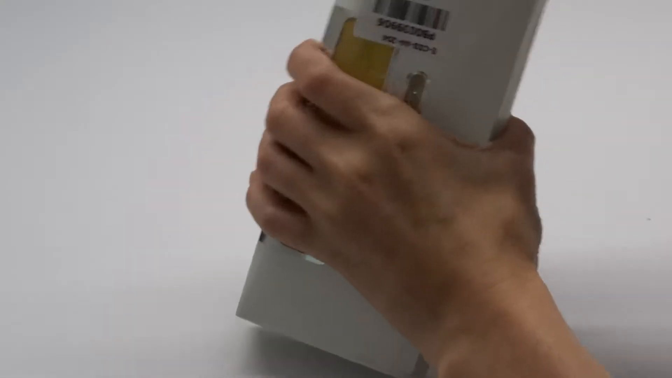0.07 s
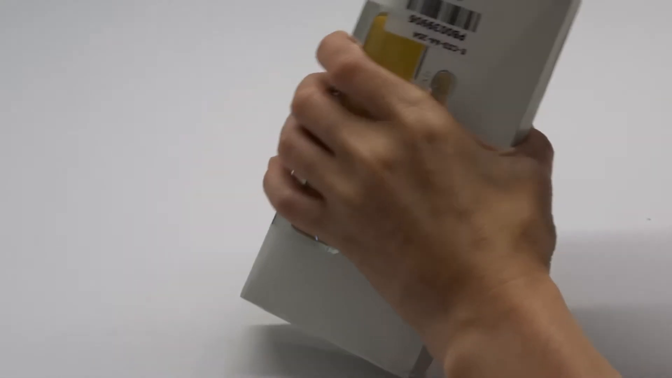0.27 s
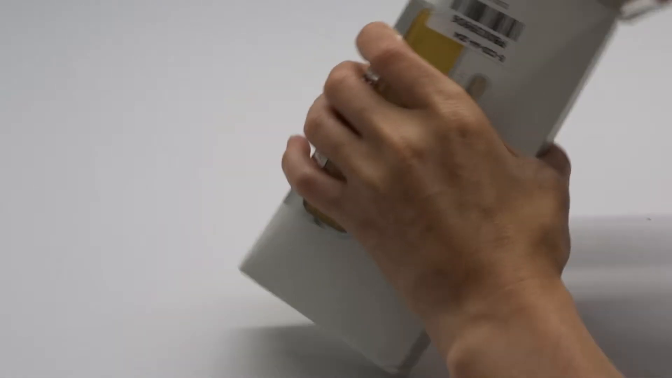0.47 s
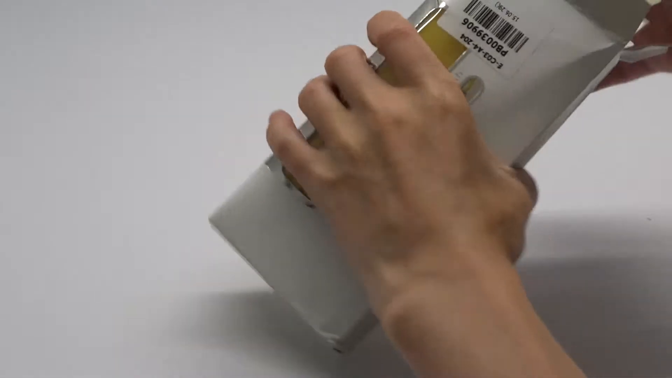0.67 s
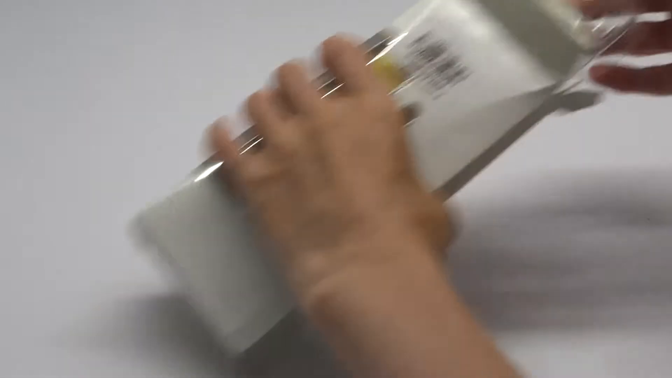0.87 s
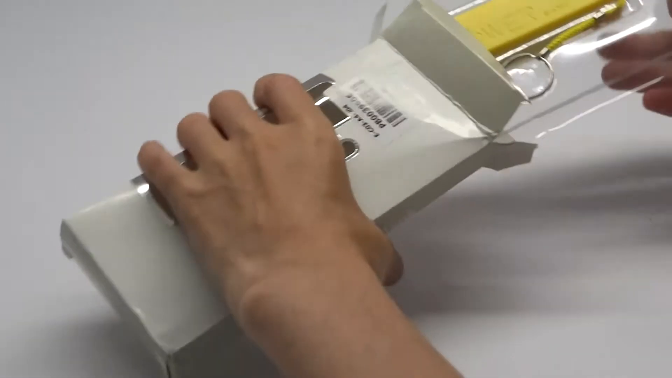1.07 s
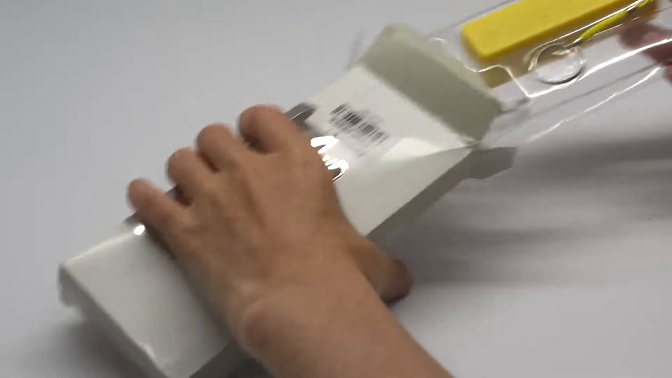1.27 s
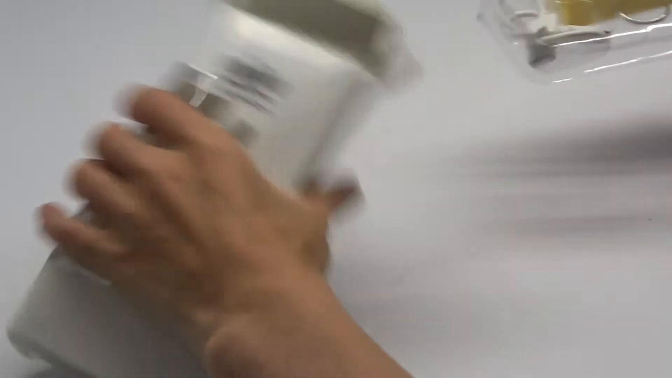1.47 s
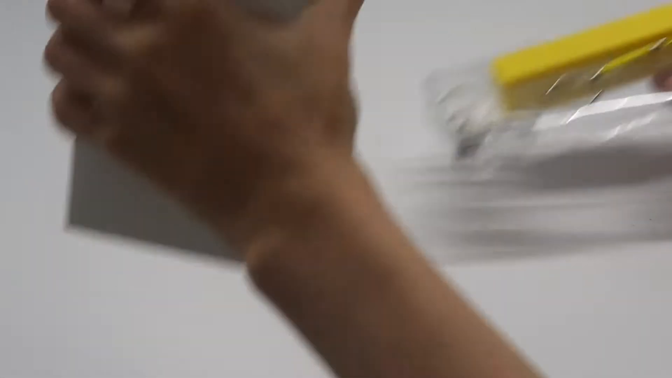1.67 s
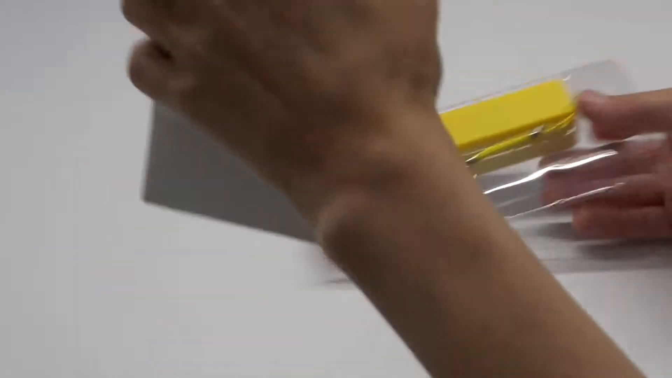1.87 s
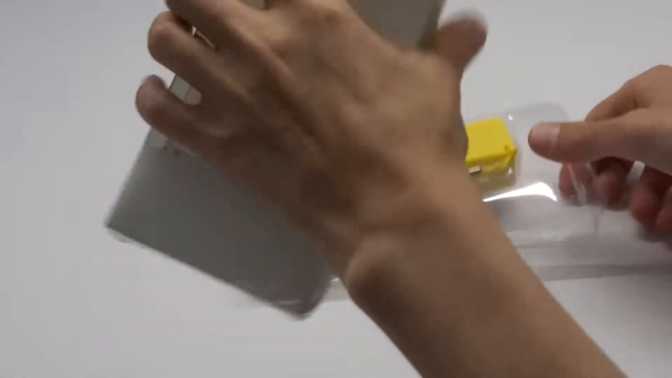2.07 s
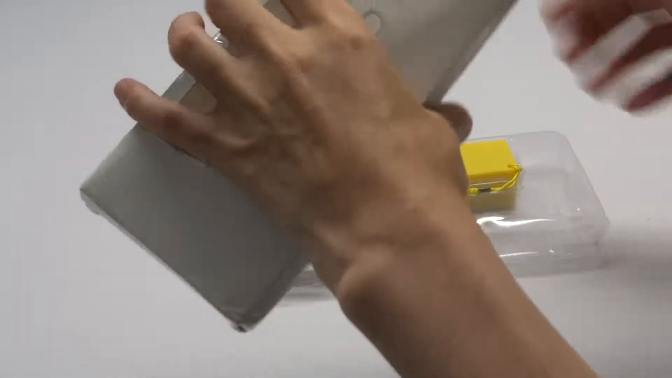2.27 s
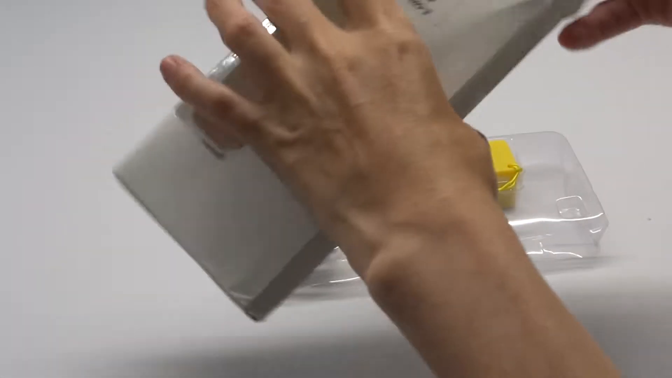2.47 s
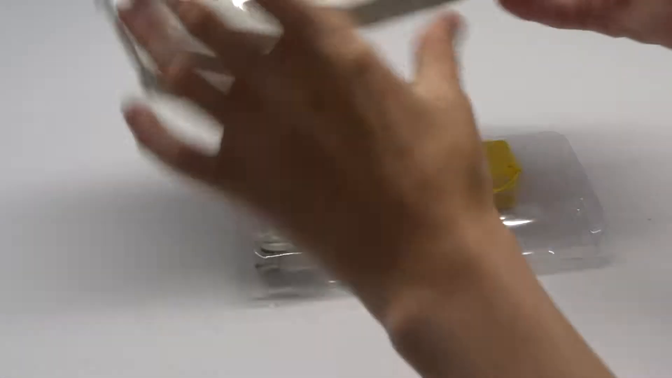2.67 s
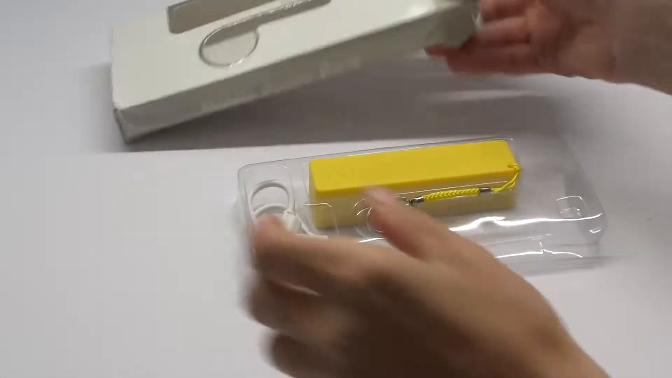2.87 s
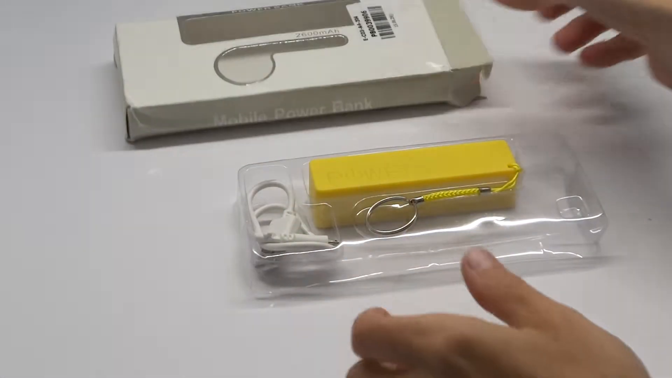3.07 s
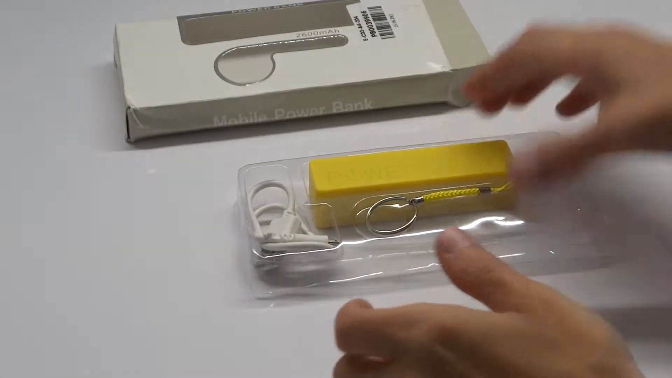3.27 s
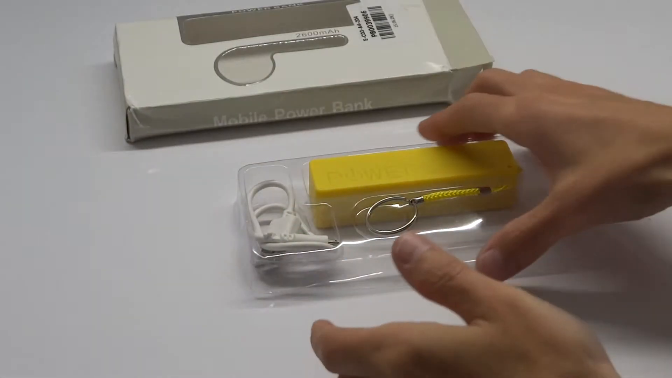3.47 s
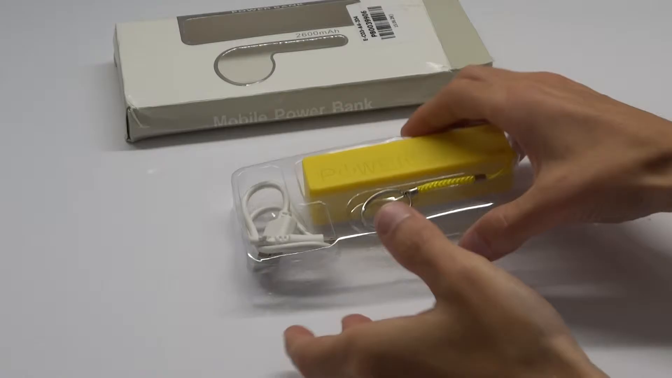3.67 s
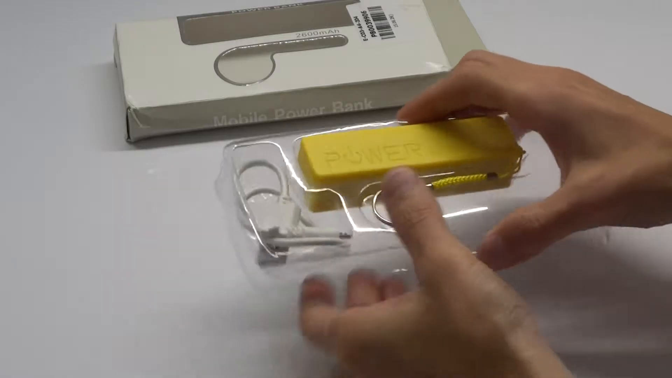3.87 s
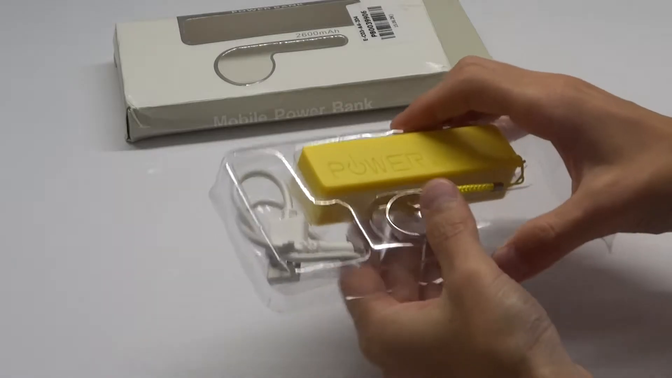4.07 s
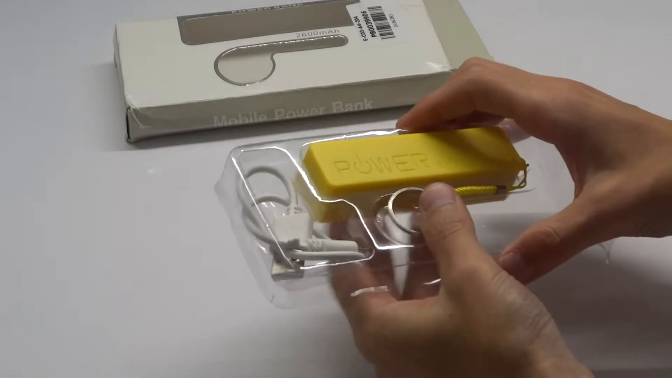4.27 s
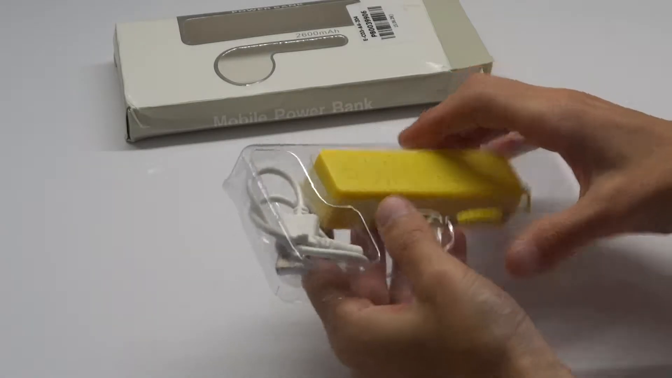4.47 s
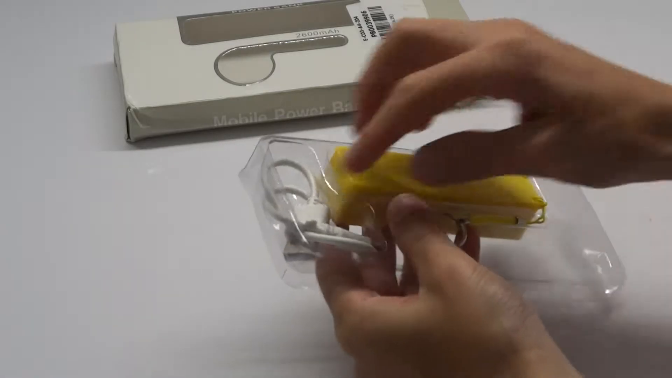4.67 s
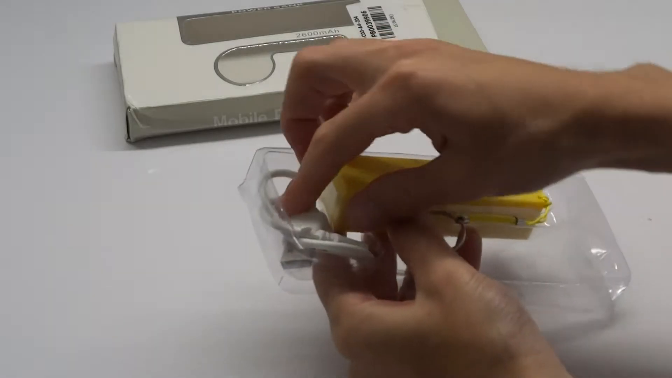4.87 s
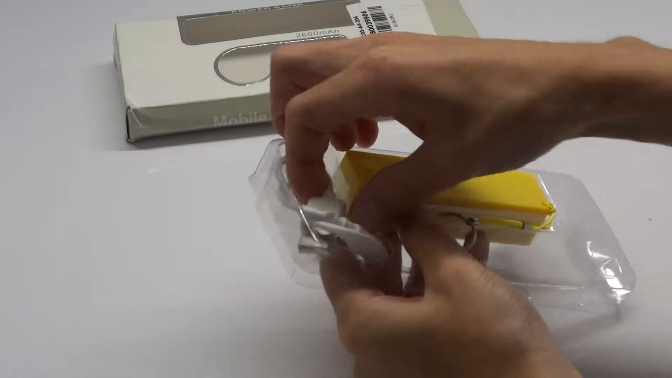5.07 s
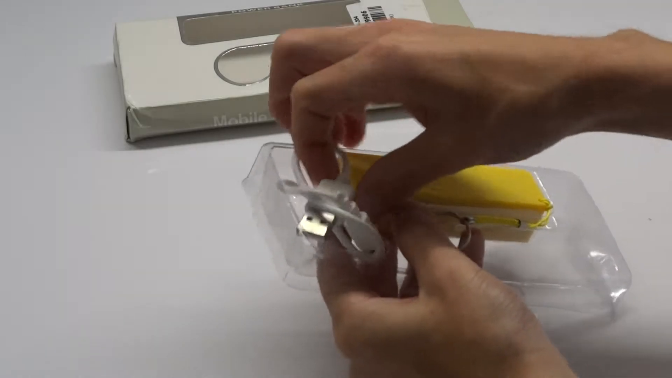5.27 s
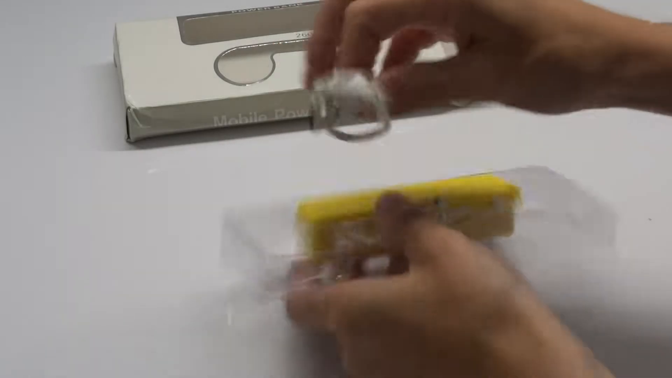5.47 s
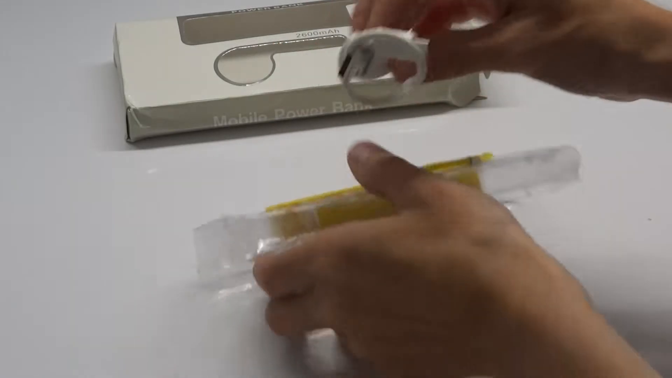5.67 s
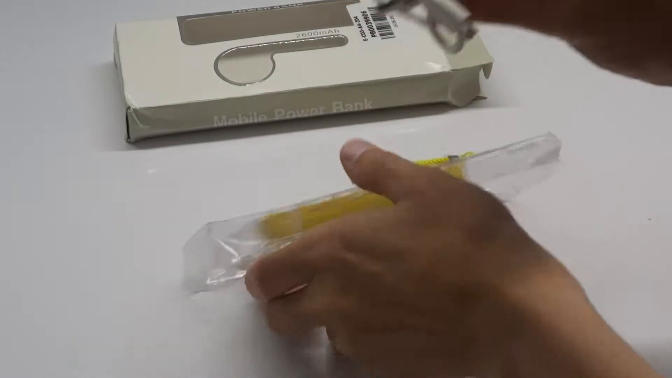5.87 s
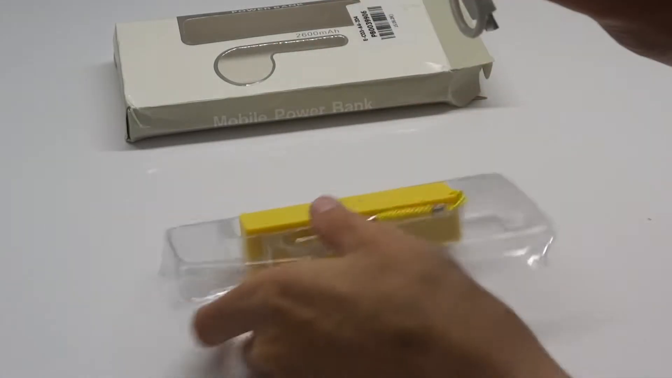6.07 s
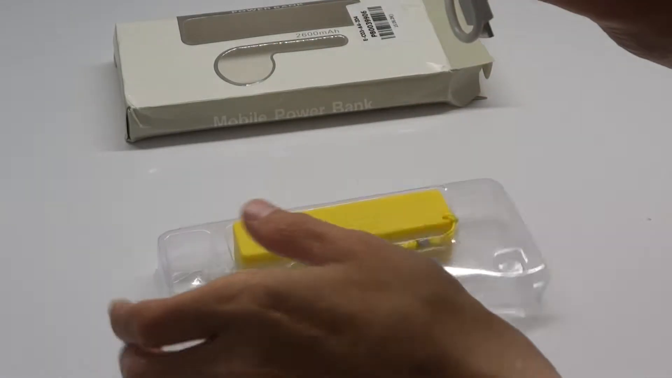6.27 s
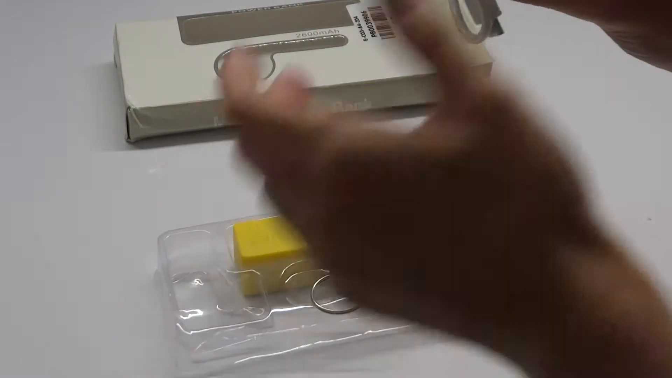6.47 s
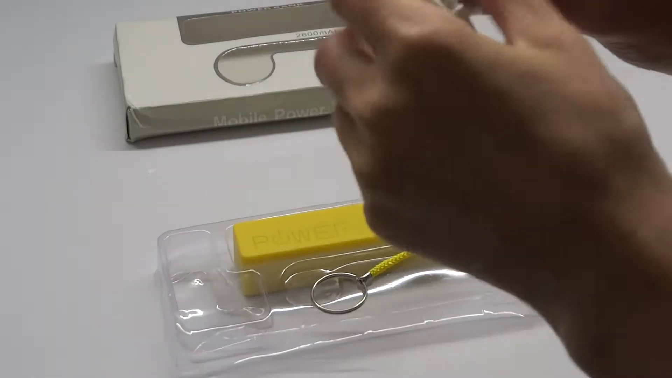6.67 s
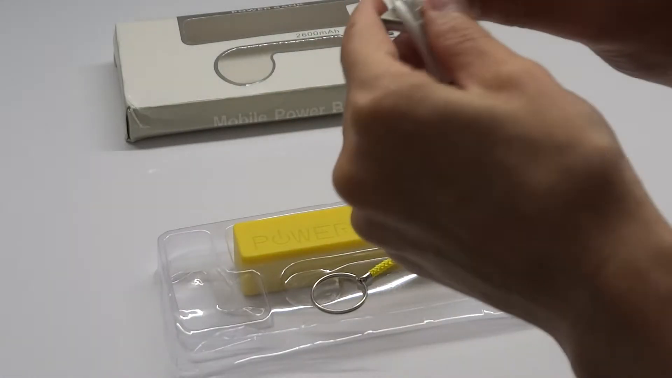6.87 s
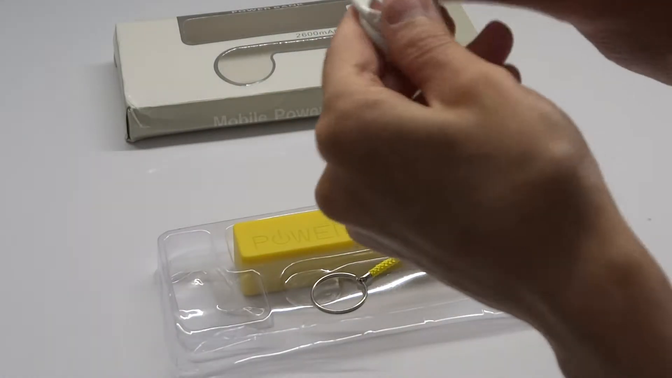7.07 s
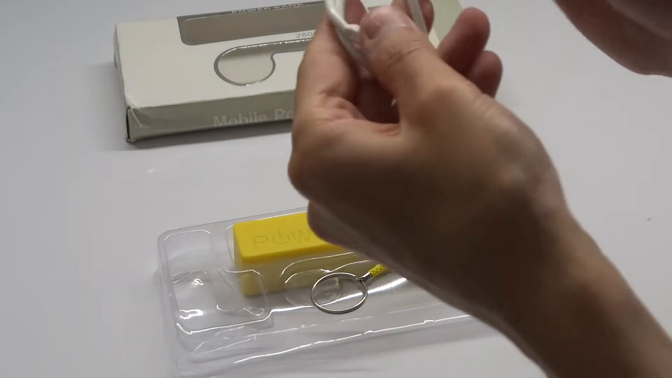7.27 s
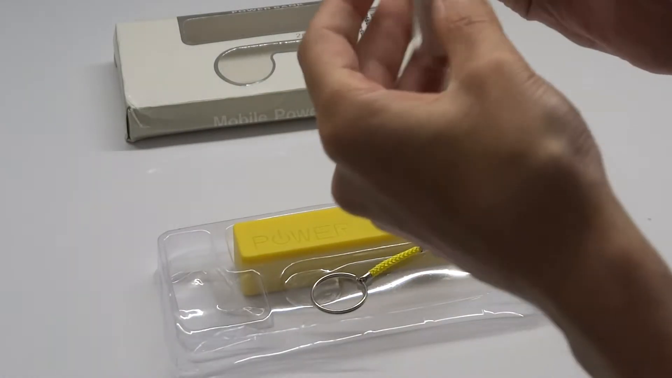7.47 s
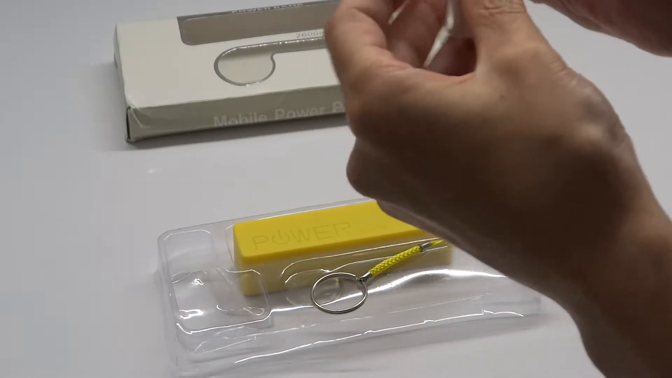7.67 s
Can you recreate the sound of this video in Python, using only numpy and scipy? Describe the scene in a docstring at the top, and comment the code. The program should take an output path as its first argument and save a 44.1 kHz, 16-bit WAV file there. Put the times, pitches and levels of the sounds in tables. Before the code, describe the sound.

Close handling of card and clear plastic packaging: sharp crinkly pops, brief rubbing, light box thuds and a chattering drag, over faint hiss.

```python
"""Hands pull a thin plastic tray out of a card box, lay both on a table and flex the tray, close by.
A faint hiss with thin tones runs throughout. From the start, surfaces rub in tiny slips, a small hard
room answers, and buckling film and card snap and knock: short noise bursts ring panel, hollow and edges.
Just before one second come the first of four thuds of the box on the table; around two seconds the tray
is dragged in four jerks that make its rim chatter. Rubbing and snaps go on, thinning out at the end."""
import sys
import numpy as np
from scipy import signal
from scipy.fft import rfft, irfft, next_fast_len
from scipy.io import wavfile
from scipy.ndimage import map_coordinates

SR = 44100
rng = np.random.default_rng(int(sys.argv[2]) if len(sys.argv) > 2 else 0)


def unload_audio(sound):
    """Save the sound as a 16-bit wav file, at the path given as the first command line argument."""
    columns = np.transpose(np.atleast_2d(sound))
    # keep every value between -1 and 1, then stretch to whole-number steps
    steps = np.round(np.clip(columns, -1, 1) * 32767)
    wavfile.write(sys.argv[1], SR, steps.astype(np.int16))


N = 340872  # length in samples

# Steady hiss: (frequency [Hz], relative level [dB per Hz])
HISS_COLOUR = [(15, -54), (25, -16), (140, -24), (189, -16.5), (324, -5.5), (361, -12.5), (472, -7),
               (670, -6.5), (901, -5.5), (1210, -6.5), (5200, -18.5), (7790, -18), (15700, -22.5)]
# How alike the hiss is on the left and right: (frequency [Hz], likeness [0 to 1])
HISS_LIKENESS = [(60, 0.53), (180, 0.23), (550, 0.24), (1650, 0.14), (4970, 0.66), (15000, 1)]
# Faint wavering tones: (frequency [Hz], middle level [dB rms])
FAINT_TONES = [(7850, -87), (12958, -87), (14002, -88)]
# Sliding strokes: (start [s], swell [s], hold [s], scrape [dB], hollow against scrape [dB],
# fizz against scrape [dB])
STROKES = [(-0.01, 0.0091, 0.0067, -36, -8.5, -2.5), (0.25, 0.087, 0.27, -52.5, 1.5, -2),
           (0.62, .12, .08, -56, 8, -0.5), (0.803, 0.069, 0.16, -30.5, -8.5, -3),
           (0.985, 0.042, 0.025, -50.5, -9, -7.5), (1.12, 0.12, .2, -55, 4, 0.5),
           (1.5, 0.065, 0.16, -62, -8.5, 2), (1.834, .03, 0.081, -41.5, -6.5, -12.5),
           (2.13, 0.021, 0.044, -28, -21.5, -2.5), (2.216, 0.022, 0.16, -44.5, -8.5, -13),
           (2.425, 0.045, 0.15, -59, -1, 0.5), (3.597, .08, 0.091, -56, -11.5, -1.5),
           (4.273, 0.083, .08, -57.5, -6, -6), (4.45, 0.081, 0.026, -43, -7, -6),
           (4.618, 0.047, .06, -70, -4.5, 4), (4.817, 0.075, 0.13, -67, -5.5, -7.5),
           (5.35, 0.17, .06, -53.5, 4.5, 4), (5.523, 0.044, .03, -40.5, -7, -23),
           (5.98, 0.26, .12, -38, -6.5, -2.5), (6.311, 0.023, 0.022, -27, -15, -37)]
# Sound of the flexing sheet: (frequency [Hz], relative level [dB per Hz])
FILM_COLOUR = [(300, -43.5), (700, -20), (1300, -2), (2200, 3), (4000, -0.5), (6500, -6), (11000, -26.5),
               (18000, -72)]
# Table top, air and walls of box and tray: (frequency [Hz], width [Hz], relative level [dB])
HOLLOW_MODES = [(180, 140, -17), (340, 130, -9.5), (673, 197, 5), (816, 503, 0)]
# Fizz from the sharp edges of a break: (frequency [Hz], relative level [dB per Hz])
FIZZ_COLOUR = [(2000, -52), (4500, -4.5), (6500, 2), (9000, 2.5), (12900, -0.5), (14900, -10), (15700, -21),
               (16400, -37.5)]
# How long the room rings: (frequency [Hz], time to fall 60 dB [s])
ROOM_FADE = [(150, 0.14), (600, 0.35), (2000, 0.33), (5000, 0.28), (14000, 0.22)]
# Room sound, side against middle: (frequency [Hz], level [dB])
ROOM_SPREAD = [(60, -16.5), (150, -19), (700, -11.5), (4000, -12), (9000, -13.5), (15000, -27)]
# Snaps and knocks: (time [s], relative level [dB], panel pitch [Hz], relative hollow level [dB],
# relative crack level [dB], time for the driving burst to fall 60 dB [s])
SNAPS = [(0.014, -21.5, 2880, -17, -8.5, .015), (0.0418, -40, 2360, -17, -24, 0.017),
         (0.1114, -16.5, 2790, -32, -11, .044), (0.1245, -22.5, 1690, -11.5, -2.5, .068),
         (0.2638, -31.5, 2550, -11, -17, .024), (0.2828, -26.5, 2520, -36, -19, .026),
         (0.3424, -11.5, 2600, -41, -20.5, .014), (0.503, -17, 2760, -25.5, -13.5, 0.081),
         (0.5147, -17, 2928, -6.5, -7.5, .053), (0.5352, -9.5, 2100, -15.5, -14, .03),
         (0.6589, -31, 2290, -39.5, -10.5, .034), (0.6836, -23, 2164, -20, -28.5, .018),
         (0.7149, -20, 1251, -5.5, -29, .039), (0.7327, -19, 2910, -32, -37.5, .04),
         (0.7761, -22, 2450, 3.5, -20, .013), (0.7939, -2.5, 2440, -43, -12.5, .03),
         (0.8676, -7, 2400, -18, -10, .025), (0.8756, -2, 2200, -10.5, -16.5, .03),
         (0.8964, -9, 1532, -23, -31, .07), (0.9911, -13.5, 3922, -7, -6, .083),
         (1.1074, -25.5, 1560, 0, -20, .027), (1.2395, -21.5, 5030, -27, -14, .036),
         (1.2913, -14, 6110, -16, -11.5, .074), (1.3545, -3, 6280, -22, -6.5, .014),
         (1.3604, -4, 4530, -18.5, -23.5, .03), (1.4074, -21.5, 1710, -8.5, -38, .027),
         (1.5616, -27, 1380, -9.5, -15, .03), (1.6034, -26, 1355, -12, -16, .03),
         (1.8394, -18.5, 3313, -15, -12, .027), (2.151, -7.5, 6830, -19, -5.5, .025),
         (2.2188, -4.5, 3216, -14, -12.5, .038), (2.2538, -6, 2070, -13.5, -9, .077),
         (2.3125, -14.5, 1523, -5, -32.5, .03), (2.3295, -10.5, 2095, -28, -11, .034),
         (2.361, -19, 1785, -36.5, -7, .03), (2.3925, -25, 1800, -10.5, -22.5, .03),
         (2.4851, -33.5, 1513, -9, -20, 0.029), (2.5227, -32, 9680, -17, -15.5, .034),
         (2.5511, -23, 2130, -9, -20.5, .05), (2.578, -17.5, 2170, -11.5, -19, .03),
         (2.9362, -8.5, 1280, -17, -14, .026), (2.9414, -5, 3500, -9.5, -18, .037),
         (3.1133, -16.5, 2240, -3.5, -13, .017), (3.1204, -24, 1360, -14, -36, .018),
         (3.6142, -34.5, 2107, -8.5, -13.5, .03), (3.677, -44, 2810, -5, -19, .03),
         (3.694, -27.5, 1960, -16, -9.5, .052), (3.7295, -10.5, 2986, -52, -51, .012),
         (4.127, -38.5, 1450, -21, -14, .026), (4.147, -36.5, 1520, -18, -16, .054),
         (4.3036, -46.5, 1390, -26, -3, .03), (4.3256, -40, 2000, -28, -0.5, .023),
         (4.3774, -29, 3540, -24, -14.5, .09), (4.4029, -23, 1640, -8.5, -9.5, .026),
         (4.4896, -15.5, 1410, -39, -13, .022), (4.5493, -24.5, 4440, -11, -7, .03),
         (4.578, -15.5, 4040, -26, -15, .01), (4.7366, -34, 1900, -6.5, -37, .03),
         (4.8359, -35.5, 4240, -15, -20, .045), (5.0454, -19, 3210, -19, -17.5, .015),
         (5.0604, -18, 2127, -18, -7.5, .016), (5.0914, -22, 1490, -10.5, -32, .035),
         (5.1967, -6.5, 4050, -40, -17, .03), (5.229, -6.5, 2590, -18.5, -17, .057),
         (5.3787, -23.5, 2570, -13.5, -12, .023), (5.443, -32.5, 2600, -30.5, -2.5, .04),
         (5.4824, -19.5, 2570, -8, -28.5, .018), (5.4891, -2, 3110, -22, -10.5, .048),
         (5.5822, -10.5, 1280, -14, -12.5, .018), (5.6, -11.5, 1876, -38, -6, .026),
         (5.6224, -23, 1850, -27.5, -3, .015), (5.6825, -22, 2122, -5.5, -11.5, .017),
         (5.7217, -9.5, 1860, -11, -18, .036), (5.7975, -29, 2065, -30, -7, .03),
         (5.8135, -12, 4080, -19.5, -9, .038), (5.92, -4.5, 2387, -13.5, -15, .015),
         (6.0023, -16.5, 1840, -15, -23, .037), (6.0709, -3, 1680, -26.5, -18.5, .019),
         (6.1859, -30.5, 1844, -11, -5, .038), (6.2516, -10.5, 2030, -17.5, -32, .03),
         (6.2824, -23, 1360, -13, -5, .03), (6.2964, -23, 2170, -27.5, -15.5, .037),
         (6.3158, -11.5, 9900, -23, -3.5, .018), (6.336, -4, 1980, -14, -9, .03),
         (6.3594, -4.5, 2300, -23.5, -13, .07), (6.4058, -7.5, 2360, -23.5, -14.5, .056),
         (7.0275, -39, 9600, -33.5, 1.5, .013), (7.1494, -47, 10060, -22, -11, .03)]
# Box struck on the table: (time [s], relative peak [dB], pitch [Hz], time for the blow to fall 60 dB [s])
THUDS = [(0.868, -17.5, 840, 0.013), (2.257, -18, 580, 0.037), (2.935, -13.5, 940, 0.066),
         (3.119, -24, 512, 0.026)]
# Tray dragged over the table in jerks: (start [s], hold [s], level [dB])
JERKS = [(1.931, 0.041, -18), (1.997, 0.027, -20), (2.047, 0.039, -20.5), (2.101, 0.022, -25.5)]
# Resonances of the dragged tray rim: (frequency [Hz], width [Hz], relative level [dB])
RIM_MODES = [(2280, 200, -9.5), (3820, 260, -1.5), (4540, 300, 2), (5650, 430, 1.5), (7150, 800, -6),
             (8750, 230, -9.5), (9920, 350, -18)]

HISS_DB = -63  # level of the middle hiss, dB rms
SWELL_DB, FADE_DB_PER_S = 19, 246.5  # how far below a stroke starts, how fast it dies afterwards
SHEET_DB = -0.5  # the whole sheet against the buckling panel, before the panel's own gain
JERK_GRIP_S, JERK_FADE_DB_PER_S = 0.0093, 601.5  # rise time and fade speed of a jerk
TOP_HZ = 16400  # nothing is kept from here up


def amp(db):
    """Turn decibels into a gain."""
    return 10 ** (np.asarray(db) / 20)


def unit(x):
    """Scale a sound to an average (rms) strength of 1."""
    return x / np.sqrt(np.mean(x ** 2) + 1e-20)


def peak(x):
    """Scale each row to a largest swing of 1."""
    return x / np.abs(x).max(axis=1, keepdims=True)


def along(points, hz):
    """Read a value off a curve of (frequency, value) points, spaced by pitch."""
    f, v = np.transpose(points)
    return np.interp(np.log(hz + 1), np.log(f + 1), v)


def filtered(x, response):
    """Reshape the frequencies of x by a response, with spare room so that tails do not wrap round."""
    n = x.shape[-1]
    m = next_fast_len(n + 4096)
    return irfft(rfft(x, m) * response(np.fft.rfftfreq(m, 1 / SR)), m)[..., :n]


def ring(hz, damping):
    """One resonance per row, its width a share of its pitch."""
    return lambda f: 1j * f * damping * hz / (hz * hz - f * f + 1j * f * damping * hz)


def modes(table):
    """Several resonances together, with alternating signs."""
    def response(f):
        total = 0
        for k, (centre, width, db) in enumerate(table):
            resonance = 1j * f * width / (centre * centre - f * f + 1j * f * width)
            total = total + (-1) ** k * amp(db) * resonance
        return total
    return response


def colour(points):
    """A filter that follows a level curve and sounds only after it is struck (folded cepstrum)."""
    def response(f):
        cepstrum = irfft(np.log(np.maximum(amp(along(points, f)), 1e-4)))
        cepstrum[1:len(cepstrum) // 2] *= 2
        cepstrum[len(cepstrum) // 2 + 1:] = 0
        return np.exp(rfft(cepstrum))
    return response


def wobble(rate):
    """A smooth random curve with `rate` random points a second."""
    knots = rng.standard_normal(int(N * rate / SR) + 4)
    return map_coordinates(knots, [np.arange(N) * rate / SR])


def slips(rate, scatter_db, smooth, clump_db):
    """Stick-slip force: scattered impulses (rate per second) of uneven size, clumped, on smooth noise."""
    hit = rng.random(N) < rate / SR
    size = amp(scatter_db * np.minimum(rng.exponential(size=N), 3.5)) * rng.standard_normal(N)
    clump = amp(clump_db * wobble(110))
    return unit(clump * (unit(hit * size) + smooth * rng.standard_normal(N)))


def background():
    """Room tone and hiss, widest in the middle frequencies, with a few faint wavering tones."""
    def middle_and_side(hz):
        turn = np.arccos(np.clip(along(HISS_LIKENESS, hz), -1, 1)) / 2  # 0 means all in the middle
        return amp(along(HISS_COLOUR, hz)) * [np.cos(turn), np.sin(turn)]

    mid, side = filtered(rng.standard_normal((2, N)), middle_and_side)
    hiss = amp(HISS_DB) * np.array([mid + side, mid - side]) / np.std(mid)
    t = np.arange(N) / SR
    tones = 0
    for hz, db in FAINT_TONES:
        level = amp(db + 3 * wobble(3.4))
        tones = tones + level * np.sqrt(2) * np.sin(2 * np.pi * hz * t)
    return hiss + tones


def rubbing():
    """Fingers, card and film slide on each other; one slip force drives sheet, hollow and edges."""
    start, swell, hold, db, hollow_db, fizz_db = (c[:, None] for c in np.transpose(STROKES))
    t = np.arange(N) / SR - start
    swell, hold = np.maximum(swell, .002), np.maximum(hold, 0)
    rise_db = SWELL_DB * np.clip(1 - t / swell, 0, 1)
    fade_db = FADE_DB_PER_S * np.maximum(t - swell - hold, 0)
    pressure = (t > 0) * amp(db - rise_db - fade_db)
    force = slips(rate=1800, scatter_db=2.5, smooth=0.47, clump_db=6)
    scrape = pressure.sum(axis=0) * unit(filtered(force, colour(FILM_COLOUR)))
    hollow = (pressure * amp(hollow_db)).sum(axis=0) * unit(filtered(force, modes(HOLLOW_MODES)))
    fizz = (pressure * amp(fizz_db)).sum(axis=0) * unit(filtered(force, colour(FIZZ_COLOUR)))
    return scrape + hollow + fizz


def room(x, hop=8192):
    """Fading noise echoes; each block of `hop` samples gets a new tail as hands and objects move."""
    out = np.zeros((2, N + SR))  # middle and side
    for start in range(0, N, hop):
        hz, t, z = signal.stft(rng.standard_normal((2, SR // 2)), SR, nperseg=256)
        z[1] *= amp(along(ROOM_SPREAD, hz))[:, None]
        fade = amp(-60 * t / along(ROOM_FADE, hz)[:, None])
        tail = signal.istft(z * fade, SR, nperseg=256)[1]
        # the first walls answer after about a millisecond, building up over a few more
        tail *= np.clip(np.arange(tail.shape[1]) / SR / 0.0029 - .3, 0, 1)
        wet = signal.fftconvolve(x[None, start:start + hop], tail / np.linalg.norm(tail[0]), axes=1)
        out[:, start:start + wet.shape[1]] += wet
    mid, side = out[:, :N]
    return np.array([mid + side, mid - side])


def snaps():
    """Each release is a ragged burst that rings a panel, booms in the hollow and cracks in the treble."""
    out, t = np.zeros(N + SR), np.arange(4096) / SR
    start, db, panel_hz, hollow_db, crack_db, t60 = (c[:, None] for c in np.transpose(SNAPS))
    t60 = np.clip(t60, .003, .2)
    draw = rng.standard_normal((len(SNAPS), 2, len(t)))
    shape = amp(-60 * t / t60) * (1 - np.exp(-t / (0.033 * t60)))  # long releases also start more softly
    spectrum = rfft(draw[:, 0] * amp(2.9 * draw[:, 1]) * shape)
    # a break feeds the frequencies more evenly, so partly level the spectrum
    force = irfft(spectrum / np.abs(spectrum) ** 0.24) * shape ** .3

    tuned = ring(panel_hz, 0.58)
    panel = peak(filtered(filtered(force, tuned), tuned))
    panel = panel + amp(SHEET_DB) * peak(filtered(force, colour(FILM_COLOUR)))
    hollow = peak(filtered(force, modes(HOLLOW_MODES)))
    crack_force = force * amp(-60 * t / 0.077)  # the treble dies first
    crack = peak(filtered(crack_force, colour(FIZZ_COLOUR)))
    mix = 0.48 * panel + amp(hollow_db - 0.5) * hollow + amp(crack_db + 8) * crack
    for s, sound in zip(start[:, 0], amp(db - 4.0) * mix):
        out[round(s * SR):][:len(t)] += sound
    return out[:N]


def thuds():
    """The box meets the table: a short fading noise sets its walls ringing briefly."""
    out, t = np.zeros(N + SR), np.arange(4096) / SR
    for start, db, hz, t60 in THUDS:
        blow = rng.standard_normal(len(t)) * amp(-60 * t / t60)
        sound = filtered(filtered(blow, ring(hz, .6)), ring(hz, .9))
        out[round(start * SR):][:len(t)] += amp(db - 1) * sound / np.abs(sound).max()
    return out[:N]


def drag():
    """Dense chatter of the rim excites its resonances, each coming and going as the contact shifts."""
    start, hold, db = (c[:, None] for c in np.transpose(JERKS))
    t = np.arange(N) / SR - start
    fade_db = JERK_FADE_DB_PER_S * np.maximum(t - JERK_GRIP_S - hold, 0)
    level = np.clip(t / JERK_GRIP_S, 0, 1) ** 2 * amp(db - fade_db)
    force = slips(rate=5300, scatter_db=4.0, smooth=.9, clump_db=-0.5)
    rim = sum(amp(5 * wobble(40)) * filtered(force, modes([mode])) for mode in RIM_MODES)
    fizz = unit(filtered(force, colour(FIZZ_COLOUR)))
    sheet = unit(filtered(force, colour(FILM_COLOUR)))
    return level.max(axis=0) * (unit(rim) + 0.29 * fizz + 0.34 * sheet)


def scene():
    """Near sources sit almost in the centre; small objects radiate little bass."""
    sources = rubbing() + snaps() + thuds() + drag()
    near = filtered(sources, lambda hz: (1j * hz / (1j * hz + 170)) ** 2)
    direct = near * amp([[-.2], [.2]])  # left and right gains in dB
    return background() + direct + amp(-2.0) * room(near)


def record(dry):
    """The microphone drops the deep bass, and nothing from the band limit up is kept."""
    return filtered(dry, lambda hz: (1j * hz / (1j * hz + 45)) ** 2 * (hz < TOP_HZ))


dry = scene()
out = record(dry)
unload_audio(out)
```